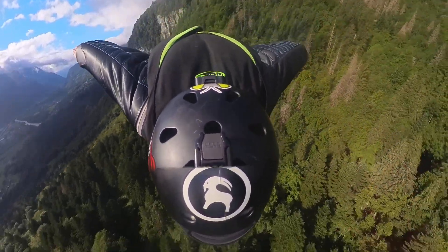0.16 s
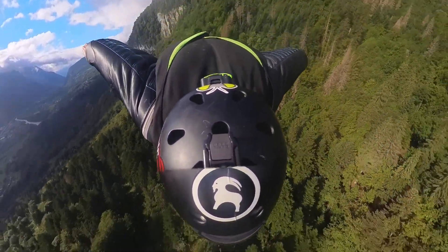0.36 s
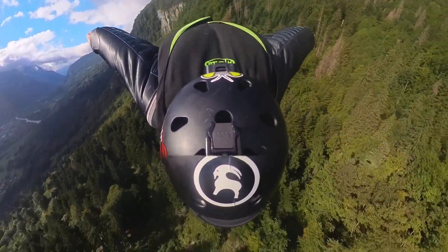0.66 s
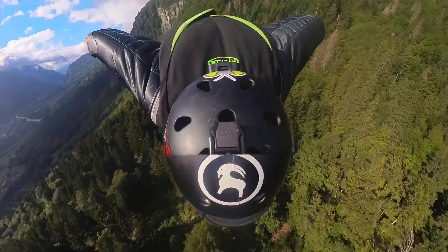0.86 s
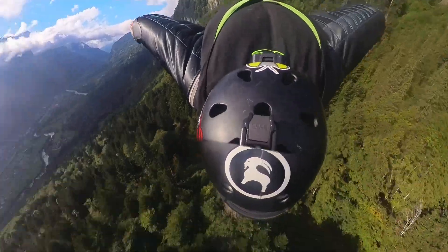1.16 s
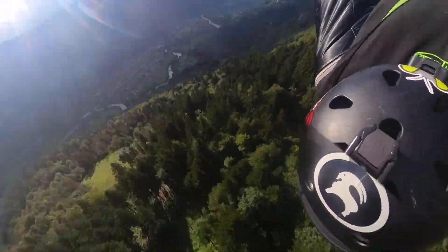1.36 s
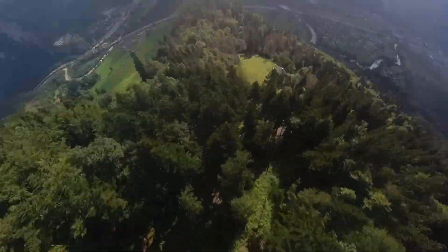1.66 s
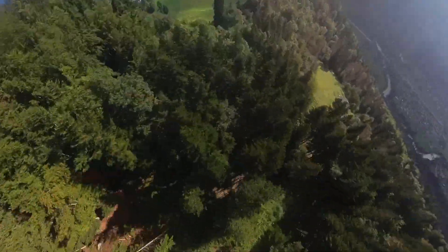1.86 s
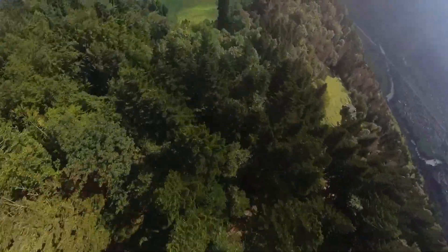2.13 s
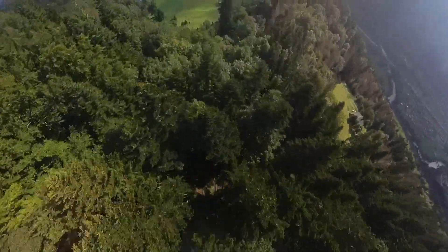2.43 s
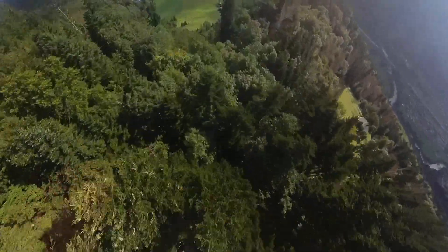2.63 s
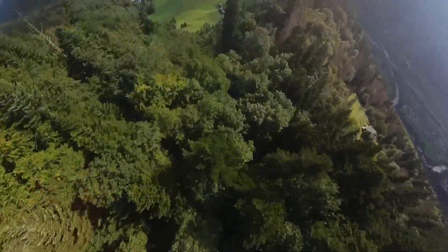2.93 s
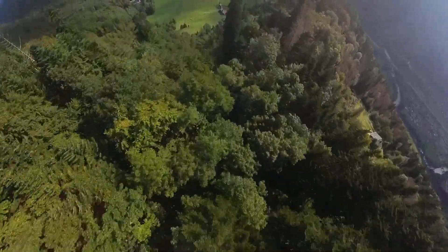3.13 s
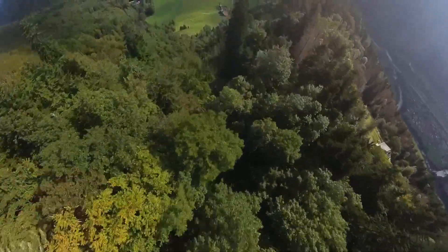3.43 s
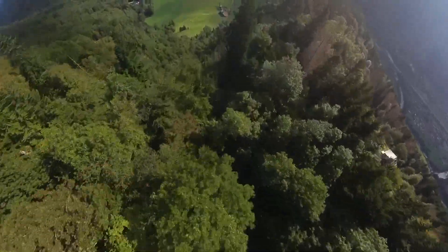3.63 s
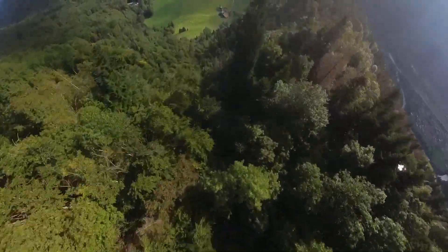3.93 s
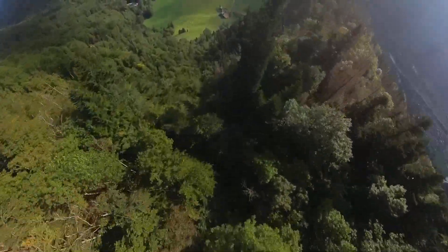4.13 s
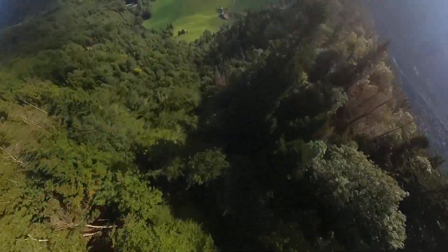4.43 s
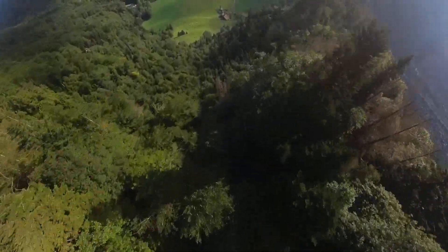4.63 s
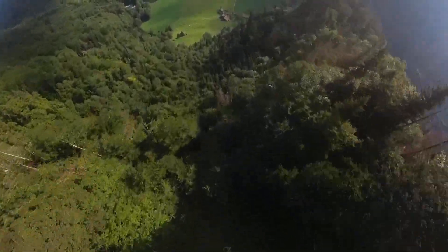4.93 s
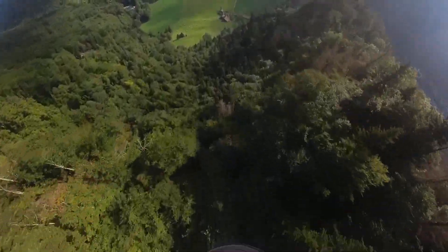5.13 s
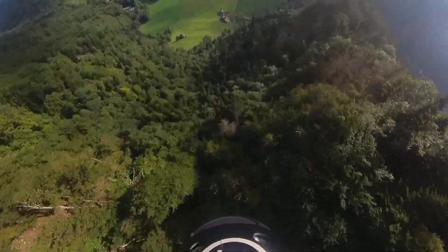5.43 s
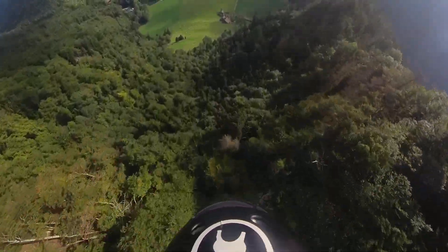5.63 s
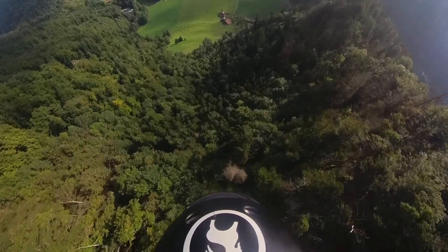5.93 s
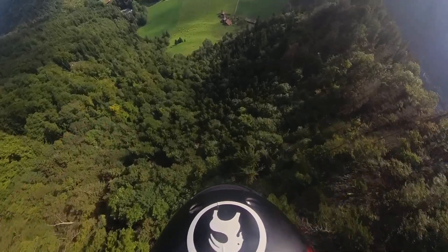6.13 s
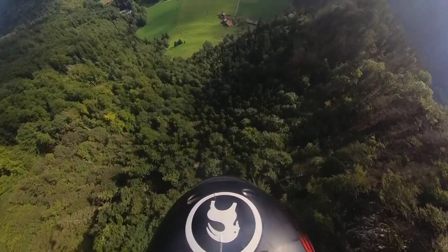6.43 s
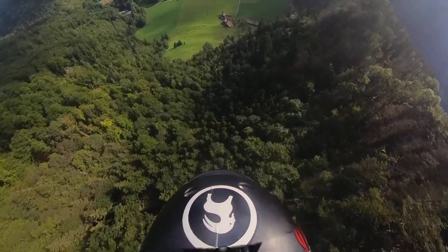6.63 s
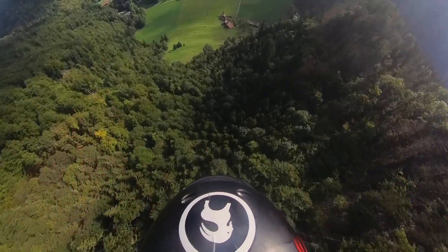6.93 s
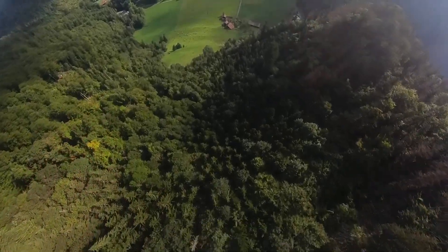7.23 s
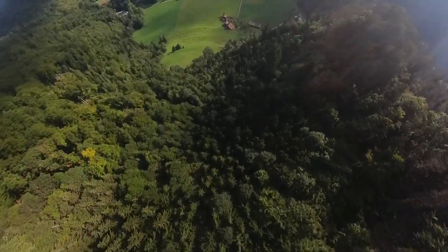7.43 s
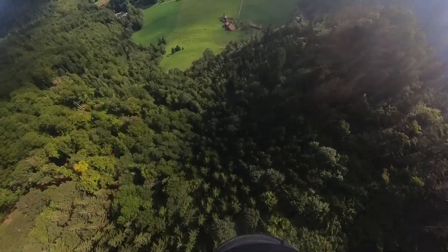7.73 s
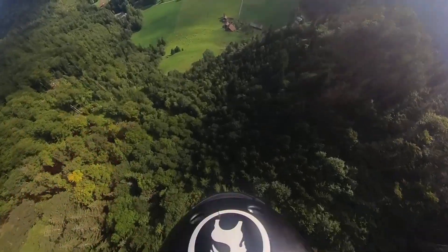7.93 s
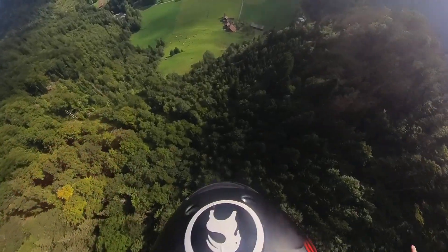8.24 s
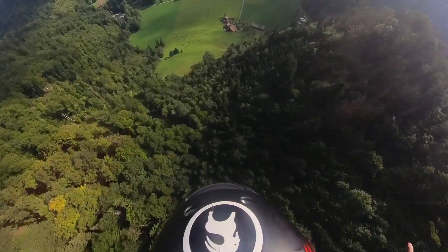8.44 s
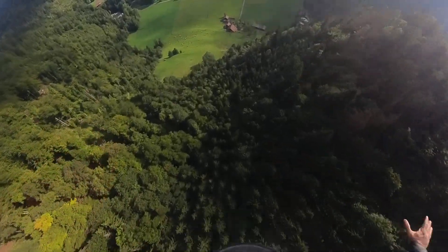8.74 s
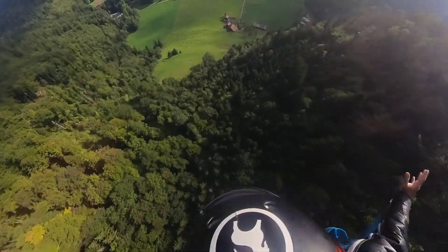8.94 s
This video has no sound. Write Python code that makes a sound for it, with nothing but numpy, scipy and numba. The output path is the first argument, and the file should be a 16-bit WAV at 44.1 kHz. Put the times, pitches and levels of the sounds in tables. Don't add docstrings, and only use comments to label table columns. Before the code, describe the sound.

Continuous roaring airflow batters a camera microphone at high speed, low thuds and rumble dominating, with thin hiss and faint breathy whistles passing through.

```python
import sys
import numpy as np
from scipy import signal
from scipy.fft import rfft, irfft, next_fast_len
from scipy.io import wavfile
from scipy.ndimage import uniform_filter1d
from numba import njit

SR = 44100
rng = np.random.default_rng(int(sys.argv[2]) if len(sys.argv) > 2 else 0)


def invert_db(level):
    return 10 ** (np.asarray(level, dtype=float) / 20)


def master(y):
    cut = np.clip(np.atleast_2d(y).T, -1, 1)
    pcm = np.round(cut * 32767)
    wavfile.write(sys.argv[1], SR, pcm.astype(np.int16))


N = 400428
STEP = 20
TIME = np.arange(N // STEP + 2) * STEP / SR
PADDED = next_fast_len(N)
FREQ = np.arange(PADDED // 2 + 1) * SR / PADDED

# time [s], force of the slipstream [dB],
# sizzle at the port rims over the rush [dB].
FLOW_POINTS = [(0, -37, -22), (.96, -38.5, -15.5), (1.04, -36, -15), (1.5, -33.5, -13.5),
               (1.73, -32, -15.5), (1.84, -39, -16.5), (2.15, -42, -13), (2.4, -35, -14.5),
               (2.75, -36.5, -16.5), (3.42, -36.5, -15.5), (3.66, -32.5, -17), (4.25, -33.5, -17.5),
               (5.05, -36.5, -17.5), (5.45, -31.5, -15.5), (6.3, -33.5, -15.5), (6.9, -35, -15.5),
               (8.3, -32.5, -17), (9.08, -35, -18.5)]
MEAN_FLOW_DB, MEAN_RIM_DB = -35, -16
# frequency [Hz], level [dB per Hz].
WIND_COLOUR = [(20, -30), (49, -5), (81, -5.5), (145, 0), (190, -0.5), (500, -12), (1420, -26.5),
               (1520, -32.5), (2000, -33), (3300, -40), (7620, -47), (11300, -46), (14100, -41),
               (15800, -44)]
# low edge [Hz], high edge [Hz].
LAYER_BANDS = [
    (40, 350),
    (600, 1800),
    (3200, 7500),
    (11000, 15500),
]
# frequency [Hz], side minus mid [dB].
PORT_DIFFERENCE = [(3000, -5), (4500, -2.5), (5500, -2.5), (8000, -1), (11000, -1), (13800, -3.5),
                   (15800, -1)]
SPLIT_HZ, TOP_HZ = 3080, 15780
# time of the break [s],
# pile-up [dB], build-up [s], lull [dB].
EDDY_BREAKS = [(0.05, -1, 0.046, -6.5), (0.171, 8, 0.086, -2), (.3, 3, 0.085, 2), (0.46, 2.5, 0.11, -2.5),
               (.92, 1.5, 0.056, -2.5), (1.3, 0.5, .06, -1.5), (0.63, 3, 0.1, -2), (0.84, -0.5, 0.04, -4),
               (1.7, -1.5, .05, -3), (1.795, 8.5, 0.05, -2), (2.04, 5, 0.089, -0.5),
               (2.139, 4, 0.034, -3.5), (2.52, 0, 0.23, -2), (2.654, 7.5, 0.046, -5.5),
               (2.43, 1, 0.07, -1.5), (2.8, 4, 0.061, 1.5), (2.898, 3.5, 0.23, -5.5), (3.06, 6.5, 0.13, -7),
               (3.175, 12.5, 0.069, -5.5), (3.366, 5, 0.11, -8), (3.45, 3.5, 0.055, -1),
               (4.06, 1, 0.037, 1), (4.24, 4, .05, -2), (3.62, 2, .05, 2.5), (4.53, -2, .07, 0),
               (4.8, 0.5, 0.044, -1.5), (5.014, 5.5, 0.11, -4.5), (5.19, 2, 0.085, -4), (5.28, 6, .06, -3),
               (5.34, 5, 0.047, 1.5), (5.9, -2.5, .05, -1.5), (6.2, -1, .05, -2), (6.45, 0, .1, -1),
               (6.85, 2.5, 0.07, 1), (7.02, 0.5, .05, -2), (7.7, 1.5, .05, 1), (8.03, 1, .05, -2),
               (8.72, -1.5, .1, 1), (8.86, -1, .05, -4), (6.64, 2.5, 0.057, -3), (7.295, 8.5, 0.03, -4),
               (7.4, 5, .04, 1), (8.19, -2.5, .05, -5.5), (8.32, 4.5, 0.059, -1.5),
               (8.39, 3.5, 0.034, -2.5), (8.99, 11.5, 0.013, -3), (9.04, 6, 0.024, 2)]
TEAR_S, REFILL_S, REFILL_S_PER_DB = 0.0035, 0.0034, 0.037
BUFFET_DB, BUFFET_FOLLOWS = -19.5, 0.02
HISS_DB, HISS_FOLLOWS, HISS_RIM = -50, 1, 0.14
DUCK, DUCK_S = 0.2, 0.08
# time [s], coarse part [dB], fine part [dB], half length [s].
GUST_PUFFS = [(0.383, 3.5, 4.5, 0.075), (0.46, -1.5, -3, .05), (.2, -1.5, 0.5, 0.065), (0.678, 1.5, 0, .08),
              (0.816, -2.5, -1, .06), (1.12, -0.5, -0.5, .06), (1.403, 0, -2.5, 0.089), (1.67, 1, 1.5, .07),
              (1.217, -0.5, -1.5, .05), (1.917, 5, 3, 0.058), (2.06, 3, 1.5, 0.11), (2.317, 1.5, -1, 0.074),
              (2.45, 0.5, 0, 0.052), (2.798, 0, 1, 0.072), (2.983, 2, 4, 0.11), (3.51, 1, 1, .06),
              (3.694, -1.5, -0.5, 0.04), (3.8, 2, -0.5, 0.036), (3.14, 3, 0, 0.027), (3.286, 3.5, 4, 0.045),
              (3.38, -3, -2.5, 0.049), (3.902, 0, -1, 0.14), (4.13, 3.5, 2, 0.11), (4.243, 1.5, 0, .04),
              (4.46, -1.5, -2, 0.08), (4.55, 0, -1, 0.065), (4.718, 2.5, 3, 0.096),
              (4.906, 2.5, -1.5, 0.088), (5.504, 1, 3.5, 0.073), (5.215, 0.5, 4.5, 0.041),
              (5.29, -2.5, -3, 0.036), (5.81, -1.5, -1.5, 0.17), (6.058, -1, 1, 0.079),
              (6.348, 2, 3.5, 0.18), (6.633, -3.5, -1, 0.037), (6.9, -0.5, 1, 0.063), (7.15, 0, 2, 0.11),
              (7.78, -1, -1.5, 0.16), (4.27, -0.5, 0.5, .06), (8.2, -2.5, 1, 0.071), (8.3, -1, -1, 0.055),
              (7.32, 0.5, 1, 0.05), (7.415, -1.5, -4, 0.057), (7.515, 2, -1, 0.042), (7.64, -1, -5, 0.063),
              (7.873, 0, 1, 0.047), (8.056, -4.5, -1.5, 0.16), (8.5, 1.5, 1.5, 0.23),
              (8.788, -1, -3, 0.099), (8.972, -3, 4.5, 0.077)]
GUST_RIM = 0.81
SHIMMER_DB = .25
# time [s], level [dB], half length [s].
RUMBLE_HEAVES = [(.1, 7, 0.16), (.3, 4, .08), (.57, -1, .08), (.7, 8, .08), (.92, 13, 0.11),
                 (1.2, -3, 0.14), (1.5, -4, 0.092), (1.8, 8, 0.085), (2.3, -5, 0.11), (2.5, 5, 0.071),
                 (2.7, 0, .08), (2.95, -4, .25), (3.3, -1, .1), (4.2, -7, 0.17), (4.5, -2, .08),
                 (4.85, 5, 0.16), (5.25, 4, 0.11), (5.48, -3, .14), (5.75, 0, 0.12), (6.2, -2, 0.11),
                 (6.7, 4, .1), (6.85, -6, .08), (7.0, 2, .1), (7.2, -8, 0.091), (7.45, -1, .12),
                 (7.75, -8, 0.22), (8.25, 8, .14), (8.55, 3, .12), (9.0, 0, .1)]
HEAVE_HZ = 95.5
# time [s], level [dB], half length [s].
CRACKLE_SWARMS = [(1.1, 3, .2), (1.5, 1.5, .12), (1.7, 2.5, 0.083), (4.08, 2, .05), (4.7, 5, .06),
                  (1.92, -4, .1), (2.2, 3.5, .12), (2.45, 2, .15), (2.9, -2.5, .3), (3.85, 1, .1),
                  (4.17, 2.5, .07), (4.6, 3, 0.27), (4.85, 1, .1), (5.13, -2, 0.12), (5.4, 0.5, .15),
                  (5.68, -1.5, 0.087), (5.95, -1, .1), (6.25, 1, .12), (7.2, -0.5, .08), (7.76, -1.5, 0.15),
                  (8.05, 3, .12)]
CRACKLE_HZ, CRACKLE_FOLLOWS = 1950, 0.045
# time [s], level [dB], half length [s].
ROAR_SPELLS = [
    (.4, -1, .12),
    (.62, 1, .15),
    (1.2, 2, .2),
    (1.66, 1.5, 0.1),
    (3.1, -1, 0.18),
    (4.2, 2, 0.23),
    (6.3, -1, 0.17),
    (7.75, 0.5, .15),
    (8.45, -0.5, .25),
]
ROAR_HZ = 855
# time [s], level [dB], half length [s].
SIZZLE_SPELLS = [
    (.35, -4, 0.4),
    (1.2, 0.5, .15),
    (2.4, -2, .1),
    (4.5, 1.5, 0.66),
    (5.35, 0, .2),
    (6.8, -0.5, 0.31),
    (7.33, 2.5, .12),
    (7.8, 3.5, .12),
    (8.7, -1.5, 0.29),
]
DULL_S, DULL_DB, DULL_HZ = 7.9, -4, 14700
STEADY, STEADY_HZ, STEADY_CYCLES = 0.45, 85, 9.6
# time [s], peak [dB], centre [Hz].
BIG_VORTICES = [(0.004, -12, 176), (0.097, -11, 175), (0.145, -9.5, 200), (0.227, -3.5, 176),
                (0.41, -7, 214), (0.594, -14, 161), (0.704, -8, 207), (0.766, -5.5, 208),
                (0.877, -5.5, 139), (0.982, -6, 190), (1.367, -6, 178), (1.696, -12, 184),
                (1.757, -12, 163), (1.816, -5, 159), (1.955, -8, 197), (2.023, -1, 154), (2.359, -8, 183),
                (2.414, -5, 213), (2.584, -9, 197), (2.635, -5, 190), (2.76, -8, 176), (2.84, -7, 225),
                (2.881, -13, 185), (3.037, -4.5, 226), (3.167, -7, 162), (3.309, -8, 163), (3.359, -8, 198),
                (3.828, -9, 220), (4.033, -7, 201), (4.389, -11, 185), (4.457, -7.5, 220), (4.574, -9, 232),
                (4.767, -13, 205), (4.819, -13, 151), (4.881, -9, 179), (4.982, -16, 188), (5.256, -5, 179),
                (5.57, -12, 181), (5.627, -9.5, 185), (5.67, -10, 229), (5.803, -6.5, 148),
                (6.475, -8, 225), (6.564, -8.5, 174), (6.611, -6.5, 222), (6.73, -6, 171), (6.862, -8, 210),
                (6.964, -10.5, 207), (7.136, -14, 206), (7.261, -7, 189), (7.375, -5, 218),
                (7.533, -7.5, 199), (7.61, -10.5, 168), (8.302, -8, 163), (8.368, -5, 193),
                (8.655, -14, 166), (8.714, -8, 204), (8.767, -9, 174), (8.814, -11, 155), (8.978, -6, 232),
                (9.035, -10, 168)]
YIELD_DB, YIELD_S = -1.5, 0.0074
# time [s], peak [dB], centre [Hz].
MIDDLING_VORTICES = [(0.095, -9, 524), (0.375, -24, 593), (0.736, -22, 557), (1.042, -24, 623),
                     (1.145, -24.5, 642), (1.436, -19, 671), (1.708, -22, 768), (1.771, -19, 549),
                     (1.909, -25, 639), (1.993, -23, 574), (2.071, -17, 541), (2.537, -22, 675),
                     (2.742, -11, 546), (2.773, -19, 570), (3.143, -17, 579), (3.327, -20, 615),
                     (3.715, -11, 646), (3.801, -15, 562), (3.99, -17, 663), (4.082, -12, 754),
                     (4.136, -14, 685), (4.183, -15, 624), (4.339, -18, 623), (4.374, -13, 668),
                     (4.404, -14, 785), (4.497, -25, 682), (4.672, -21, 640), (4.732, -12, 797),
                     (4.941, -13, 579), (5.153, -20, 613), (5.33, -22, 606), (5.401, -23, 651),
                     (5.546, -20, 601), (5.584, -21, 675), (5.775, -16, 700), (6.123, -24, 628),
                     (6.153, -24, 618), (6.326, -21, 735), (6.365, -10, 635), (6.397, -8, 571),
                     (7.145, -19, 551), (7.216, -21, 560), (7.477, -16, 609), (7.597, -20, 595),
                     (7.905, -10, 605), (7.987, -21, 649), (8.487, -15, 625), (8.702, -15, 703),
                     (8.971, -17, 584), (9.027, -17, 631)]
# time [s], peak [dB], centre [Hz].
LITTLE_VORTICES = [(0.215, -27, 627), (0.318, -30, 611), (1.085, -28, 713), (1.545, -26, 759),
                   (1.619, -24, 807), (1.659, -22, 614), (1.719, -23, 805), (2.299, -28, 627),
                   (2.399, -26, 783), (2.469, -28, 678), (3.639, -14, 743), (3.858, -22, 670),
                   (4.117, -17, 646), (4.213, -23, 600), (4.556, -17, 953), (4.689, -23, 600),
                   (4.721, -19, 692), (5.312, -22, 821), (5.765, -24, 624), (6.577, -25, 681),
                   (7.388, -23, 816), (7.585, -18, 600), (8.259, -22, 670), (8.299, -14, 649),
                   (8.452, -20, 651), (8.549, -23, 600), (8.839, -22, 643)]
# time [s], peak [dB], centre [Hz].
TINY_VORTICES = [(1.3005, -28, 1690), (2.8046, -39, 1990), (2.9218, -37, 1940), (3.5115, -33, 1770),
                 (3.6511, -32, 1670), (3.7629, -21, 1960), (3.8272, -24, 1930), (3.932, -31, 1560),
                 (4.0453, -24, 2020), (4.0875, -19, 2050), (4.1585, -22, 2390), (4.187, -28, 2500),
                 (4.13, -29, 2800), (4.31, -28, 1900), (4.6369, -24, 1910), (4.7756, -30, 2060),
                 (4.8923, -31, 1570), (4.9287, -29, 1890), (4.9607, -27, 1930), (5.0001, -36, 1500),
                 (5.1068, -31, 1530), (6.8284, -36, 1740), (7.4625, -27, 1700), (7.9893, -32, 1760)]
# time [s], peak [dB], centre [Hz].
CUT_VORTICES = [
    (-.003, -15, 200),
    (9.076, -15, 200),
]
# time [s], peak [dB], centre [Hz].
HELMET_JOLTS = [(.9, -22, 50), (2.47, -23, 50), (2.52, -22, 60), (3.313, -21, 70), (3.62, -18.5, 70),
                (3.78, -22, 48), (4.865, -18, 55), (4.975, -21, 60), (5.265, -21, 45), (5.75, -23, 55),
                (6.24, -23, 60), (7.93, -23, 46)]
# start [s], length [s], first pitch [Hz], last pitch [Hz], level [dB].
WHISTLE_GLIDES = [
    (.15, .53, 9700, 9600, -65),
    (0.712, .63, 9300, 9150, -59),
    (1.62, 0.14, 9520, 9600, -57),
    (2.16, .49, 9500, 9150, -55.5),
    (3.037, 0.48, 10200, 9800, -55.5),
    (5.16, 0.15, 8800, 9700, -54),
    (5.29, 0.19, 8700, 7900, -53),
    (7.85, .11, 9100, 8500, -52.5),
    (7.95, .1, 8200, 7950, -54),
]
WHISTLE_FADE_S, WHISTLE_ALIKE_DB = .04, -5
# time [s], level [dB], half length [s], pitch [Hz], width [Hz].
VENT_HUMS = [
    (8.3, -36, .08, 656, 26),
    (8.69, -38, .09, 640, 25),
    (8.27, -40, .08, 1170, 130),
    (8.55, -43, 0.22, 1120, 300),
    (8.89, -43, .1, 1200, 30),
]
OPEN_S, VEILED_DB, RIM_HZ, VEILED_TOP_HZ = .733, -11, 10500, 14900


def slipstream(bass_db=-0.1, shared_db=0.25, own_db=0.6, side_own_db=2.0):
    colour, mid, side = turbulence()
    levels = layer_levels()
    heave, swarm, roar = spells(RUMBLE_HEAVES), spells(CRACKLE_SWARMS), spells(ROAR_SPELLS)
    swarm = swarm + CRACKLE_FOLLOWS * (levels[1] - MEAN_FLOW_DB)
    dulling = DULL_DB * np.clip((TIME - DULL_S) / .3, 0, 1)
    edge_hz, edge_gain = whistling()
    gains = []
    for db, (low, high) in zip(levels, LAYER_BANDS):
        power = 2 / PADDED * np.sum(colour[(FREQ > low) & (FREQ < high)] ** 2)
        gains.append(db - 10 * np.log10(power))
    anchors = np.log([260., 850., 3800., 7200., 12000.])
    centres = np.append(20 * 2 ** np.arange(0, 7.4, .4), np.arange(3800, TOP_HZ, 950))
    out, gust, flutter = np.zeros((2, N)), walk(6.2), walk(50)
    for k, hz in enumerate(centres):
        place = np.interp(np.log(hz), anchors, [0, 1, 1.5, 2.5, 3])
        db = sum(max(0, 1 - abs(place - j)) * gains[j] for j in range(4))
        shape = np.interp(np.log(FREQ + 1), np.log(centres), np.arange(len(centres)) == k)
        gust = 0.8 * gust + 0.82 * walk(14)
        depth = bass_db + (1 - bass_db) * min(place, 1)
        db = db + depth * shared_db * gust
        db = db + heave / (1 + (hz / HEAVE_HZ) ** 4)
        db = db + swarm * np.exp(-np.log(hz / CRACKLE_HZ) ** 2 / 0.19)
        db = db + roar * np.exp(-np.log(hz / ROAR_HZ) ** 2 / 0.24)
        db = db + dulling * (hz > DULL_HZ)
        if hz > SPLIT_HZ:
            flutter = .5 * flutter + .85 * walk(75)
            db = db + 1.4 * flutter
        band = irfft(shape * mid, PADDED)[:N]
        if hz < STEADY_HZ:
            band = steadied(band, hz)
        out[0] += samples(invert_db(db + depth * own_db * walk(20))) * band
        if hz > SPLIT_HZ / 2:
            alike = uniform_filter1d(1. * (walk(60) < -1.35), size=10)
            near_whistle = np.exp(-((hz - edge_hz) / 800) ** 2)
            db = db + WHISTLE_ALIKE_DB * edge_gain / edge_gain.max() * near_whistle
            band = irfft(shape * side, PADDED)[:N]
            out[1] += samples(invert_db(db + side_own_db * walk(30) - 20 * alike)) * band
    return out


def turbulence(eddy_share=0.44, eddy_hz=395.0, crackle=0.18):
    colour = over_pitch(WIND_COLOUR) * (FREQ < TOP_HZ)
    large = eddy_share / (1 + (FREQ / eddy_hz) ** 4)
    fine = crackle * np.exp(-np.log((FREQ + 1) / 1900.0) ** 2 / .5)
    kicks = rfft(eddies(per_second=220, scatter_db=13.0), PADDED)
    small = rfft(eddies(per_second=330, scatter_db=20.5), PADDED)
    even = np.sqrt(np.maximum(1 - large - fine, 0)) * rfft(rng.standard_normal(N), PADDED)
    mid = colour * (np.sqrt(large) * kicks + np.sqrt(fine) * small + even)
    side = colour * over_pitch(PORT_DIFFERENCE) * (FREQ > SPLIT_HZ) * rfft(rng.standard_normal(N), PADDED)
    return colour, mid, side


def eddies(per_second, scatter_db):
    kicks = np.zeros(N)
    when, strength, sign = rng.random((3, int(per_second * N / SR)))
    np.add.at(kicks, (when * N).astype(int), invert_db(scatter_db * strength) * np.sign(sign - .55))
    return unit(kicks)


def layer_levels():
    flow, rim, (piles, lulls) = curve(FLOW_POINTS, 1), curve(FLOW_POINTS, 2), breaks()
    keep = np.exp(-1 / (DUCK_S * SR / STEP))
    duck = DUCK * signal.lfilter([1 - keep], [1, -keep], piles)
    coarse, fine = gusts(column=1) - duck, gusts(column=2) - duck
    over = flow - MEAN_FLOW_DB
    buffet = BUFFET_DB + BUFFET_FOLLOWS * over + piles + lulls + yielding() + 0.65 * walk(18)
    rush = flow + coarse + 0.32 * walk(20)
    hiss = HISS_DB + HISS_FOLLOWS * over + HISS_RIM * (rim - MEAN_RIM_DB) + fine + SHIMMER_DB * walk(30)
    sizzle = flow + rim + GUST_RIM * fine + spells(SIZZLE_SPELLS) + SHIMMER_DB * walk(25)
    return [buffet, rush, hiss, sizzle]


def breaks():
    piles, lulls = 0, 0
    for s, pile_db, build, lull_db in EDDY_BREAKS:
        corners = [s - 1.26 * build, s - .5 * build, s, s + TEAR_S]
        piles = piles + np.interp(TIME, corners, [0, pile_db, pile_db, 0])
        tear = np.clip((TIME - s) / TEAR_S, 0, 1)
        refill_s = REFILL_S + REFILL_S_PER_DB * abs(lull_db)
        lulls = lulls + lull_db * tear * np.exp(-np.maximum(TIME - s - TEAR_S, 0) ** 2 / refill_s ** 2)
    return piles, lulls


def yielding():
    cover = sum(np.exp(-((TIME - s - .75 / hz) / YIELD_S) ** 2) for s, db, hz in BIG_VORTICES)
    return YIELD_DB * np.minimum(cover, 1)


def gusts(column):
    return spells([(row[0], row[column], row[3]) for row in GUST_PUFFS])


def puffs(table, cycles, trim_db):
    reach = 2500
    out, t = np.zeros(N + 3 * reach), np.arange(-reach, reach) / SR
    skew = rng.uniform(-0.57, 0.71, len(table))
    for (s, db, hz), phase in zip(table, skew):
        swing = -np.exp(-(t * hz / cycles) ** 2) * np.cos(2 * np.pi * hz * t + phase)
        start = int((s + cycles / hz) * SR)
        out[start:start + 2 * reach] += invert_db(db + trim_db) * swing
    return out[reach:N + reach]


def whistle(wander=0.04, waver_db=1.0, width_hz=1900.):
    drift, ragged = 1 + wander * walk(25), 2.2 * walk(45)
    hz, gain = whistling()
    hz = samples(hz * drift)
    tone = unit(svf(svf(rng.standard_normal(N), hz, width_hz), hz, width_hz))
    return samples(gain * invert_db(ragged + waver_db * walk(15))) * tone


def whistling():
    hz, gain = np.full(len(TIME), WHISTLE_GLIDES[0][2] * 1.), 0
    for start, length, first_hz, last_hz, db in WHISTLE_GLIDES:
        end, fade = start + length, WHISTLE_FADE_S + .15 * length
        glide = np.interp(TIME, [start, end], [first_hz, last_hz])
        hz = np.where(TIME > start - fade / 2, glide, hz)
        edge = np.clip(np.minimum(TIME - start, end - TIME) / fade + .5, 0, 1)
        gain = gain + invert_db(db) * np.sin(edge * np.pi / 2) ** 2
    return uniform_filter1d(hz, size=120), gain


def hums():
    out = 0
    for s, db, half, hz, width in VENT_HUMS:
        centre = np.full(N, 1. * hz)
        air = svf(svf(rng.standard_normal(N), centre, 1. * width), centre, 1.4 * width)
        air = steadied(steadied(air, 8 * width), 8 * width)
        out = out + invert_db(db) * samples(spells([(s, 1, half)])) * unit(air)
    return out


def spells(table):
    out = 0
    for s, db, half in table:
        out = out + db * np.cos(np.clip((TIME - s) / max(half, .01), -1, 1) * np.pi / 2) ** 2
    return out


def curve(table, column):
    rows = np.array(table)
    return np.interp(TIME, rows[:, 0], rows[:, column])


def walk(rate):
    k = int(SR / STEP / rate)
    held = np.repeat(rng.standard_normal(len(TIME) // k + 1), k)
    return 1.54 * uniform_filter1d(uniform_filter1d(held, k), k)[:len(TIME)]


def samples(control):
    return np.interp(np.arange(N), TIME * SR, control)


def over_pitch(table):
    rows = np.array(table)
    return invert_db(np.interp(np.log(FREQ + 1), np.log(rows[:, 0]), rows[:, 1]))


def unit(x):
    return x / np.sqrt(np.mean(x ** 2))


def steadied(x, hz):
    power = uniform_filter1d(x ** 2, size=int(STEADY_CYCLES * SR / hz)) / np.mean(x ** 2)
    return unit(x * np.maximum(power, .05) ** (-STEADY / 2)) * x.std()


@njit
def svf(x, hz, width):
    y, band, low = np.empty(len(x)), 0., 0.
    for i in range(len(x)):
        g, k = np.tan(np.pi * hz[i] / SR), width / hz[i]
        v = (band + g * (x[i] - low)) / (1 + g * (g + k))
        band, low, y[i] = 2 * v - band, low + 2 * g * v, k * v
    return y


@njit
def limiter(x, top, ratio, attack, release):
    gain, level = np.ones(len(x)), 0.
    for i in range(len(x)):
        a = abs(x[i])
        level += (a - level) * (attack if a > level else release)
        if level > top:
            gain[i] = (top / level) ** (1 - 1 / ratio)
    return gain


def scene():
    mid, side = slipstream()
    mid = mid + puffs(BIG_VORTICES, cycles=0.692, trim_db=-2.0)
    mid = mid + puffs(MIDDLING_VORTICES, cycles=1.185, trim_db=-8.0)
    mid = mid + puffs(LITTLE_VORTICES, cycles=0.84, trim_db=-6.0)
    mid = mid + puffs(TINY_VORTICES, cycles=0.88, trim_db=-2.0)
    mid = mid + puffs(CUT_VORTICES, cycles=0.71, trim_db=0.0)
    mid = mid + puffs(HELMET_JOLTS, cycles=0.75, trim_db=-1.0)
    mid = mid + whistle() + hums()
    return np.array([mid + side, mid - side])


def low_pass(x):
    return signal.sosfilt(signal.butter(12, 15900, fs=SR, output="sos"), x)


def record(dry):
    ahead = 130
    heard = np.append(dry.mean(axis=0), np.zeros(ahead))
    gain = limiter(heard, top=0.31, ratio=13.0, attack=0.022, release=0.00045)[ahead:]
    held = dry * uniform_filter1d(gain, size=ahead)
    veil = np.where(FREQ < RIM_HZ, 1, invert_db(VEILED_DB) * (FREQ < VEILED_TOP_HZ))
    narrow = np.interp(FREQ, [8800, 9200, 10400, 10600, 13400, 13700], [0.88, .3, .3, 0.88, 1, .3])
    mid = rfft(held[0] + held[1], PADDED) / 2
    side = rfft(held[0] - held[1], PADDED) / 2 * narrow
    veiled = irfft(veil * np.array([mid + side, mid - side]), PADDED)[:, :N]
    mix = np.where(np.arange(N) < OPEN_S * SR, veiled, held)
    return low_pass(mix)


dry = scene()
out = record(dry)
master(out)
```